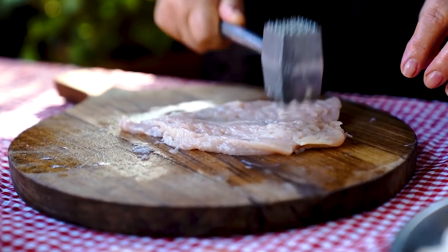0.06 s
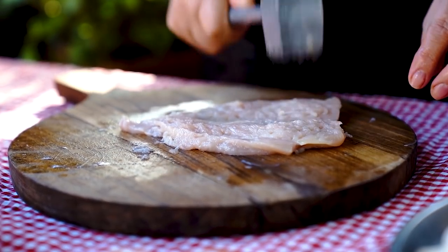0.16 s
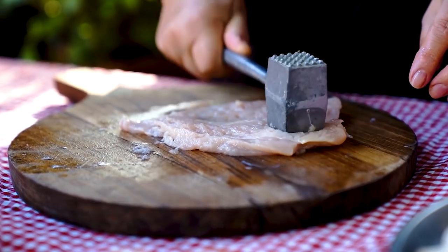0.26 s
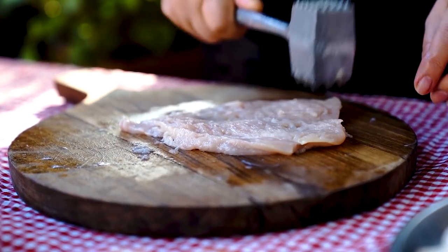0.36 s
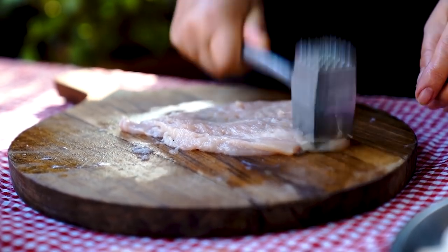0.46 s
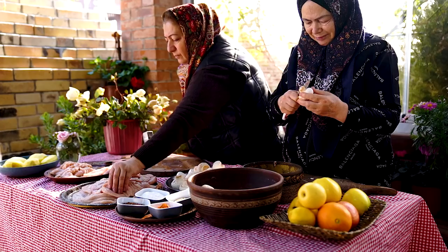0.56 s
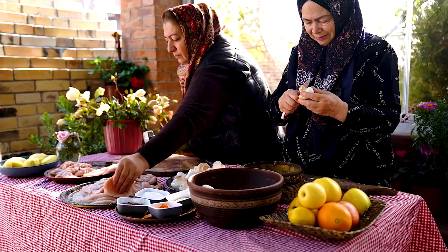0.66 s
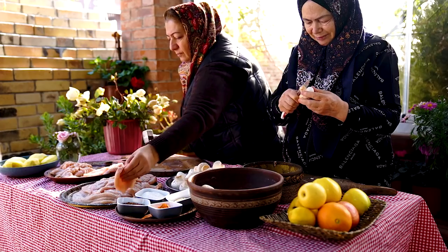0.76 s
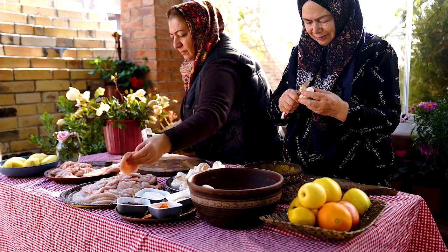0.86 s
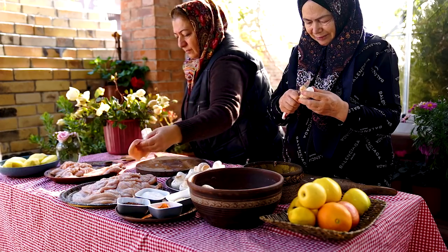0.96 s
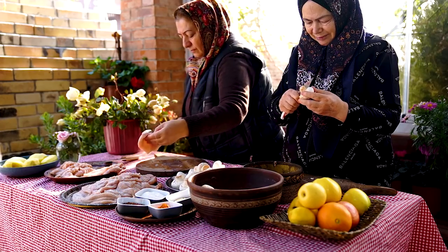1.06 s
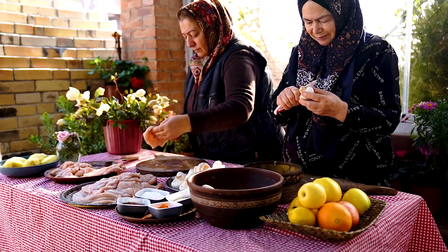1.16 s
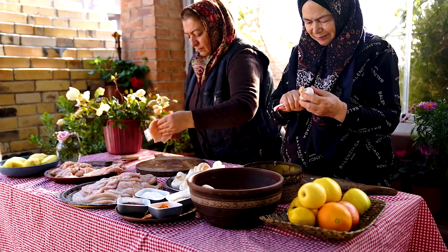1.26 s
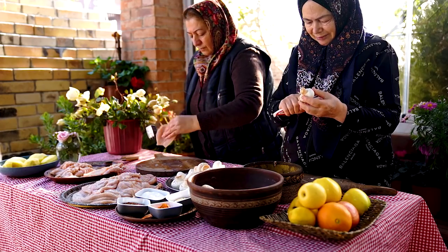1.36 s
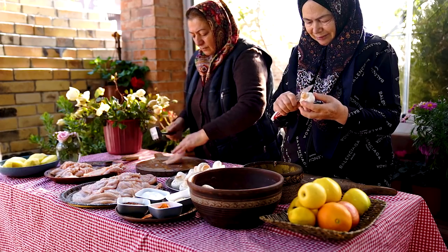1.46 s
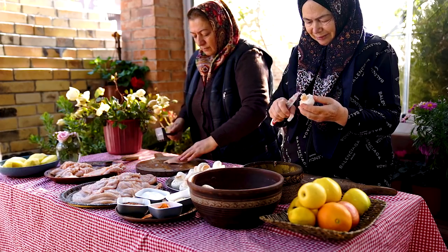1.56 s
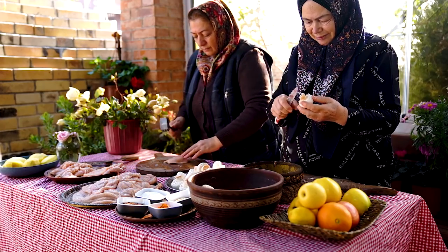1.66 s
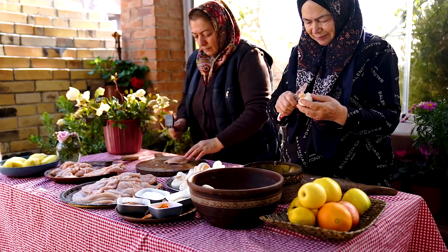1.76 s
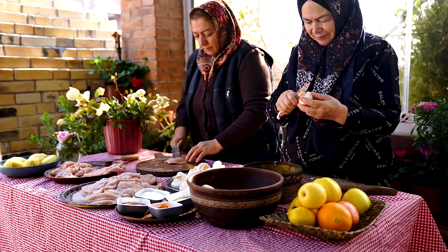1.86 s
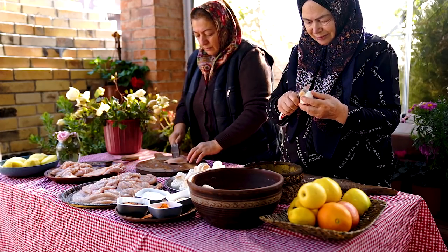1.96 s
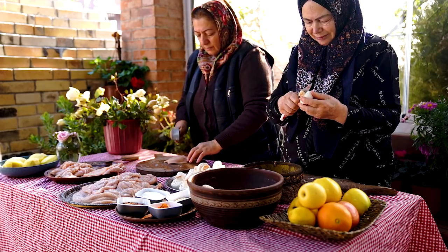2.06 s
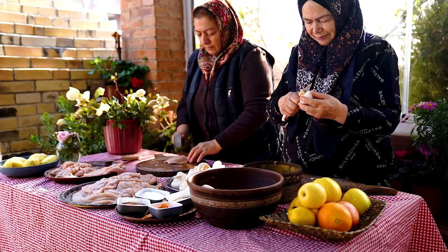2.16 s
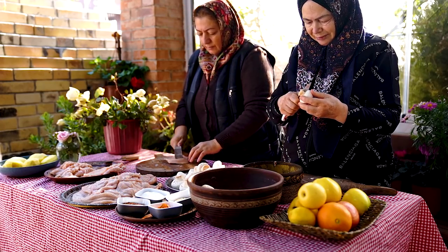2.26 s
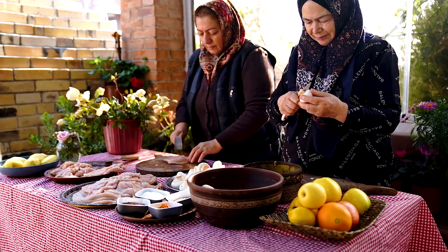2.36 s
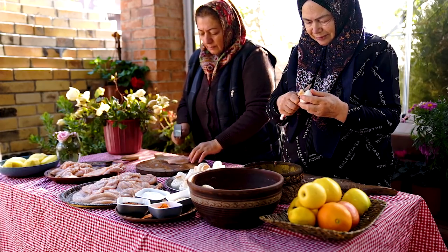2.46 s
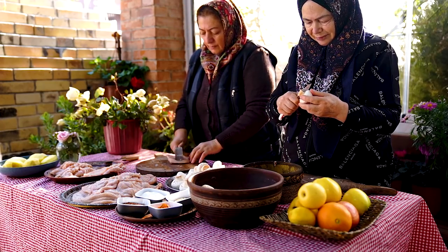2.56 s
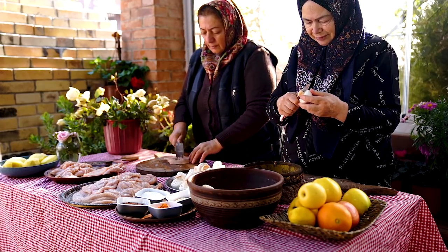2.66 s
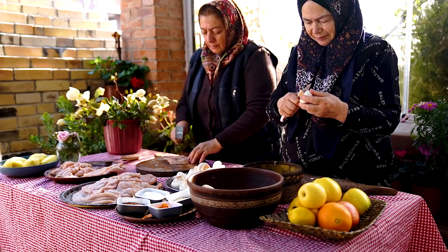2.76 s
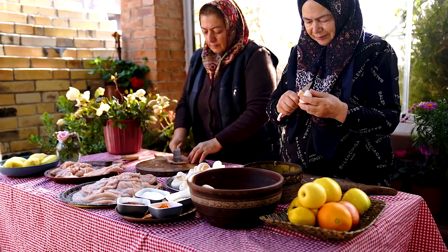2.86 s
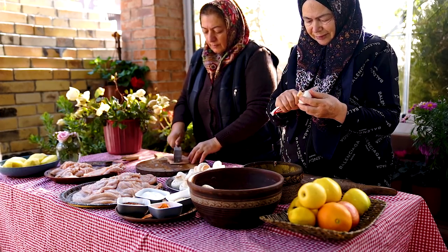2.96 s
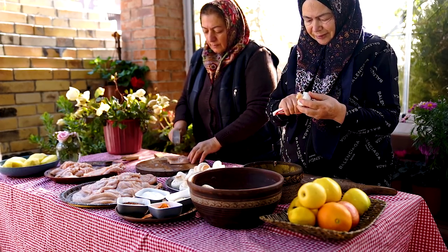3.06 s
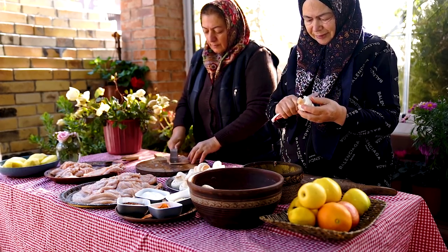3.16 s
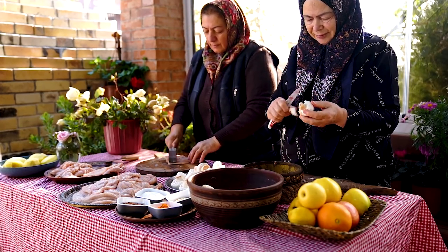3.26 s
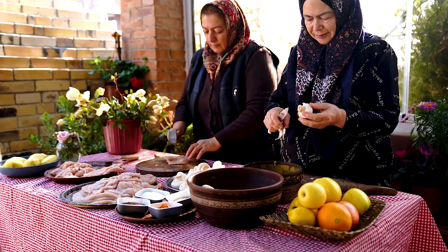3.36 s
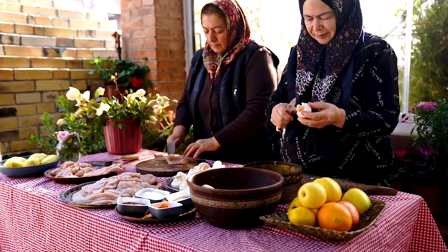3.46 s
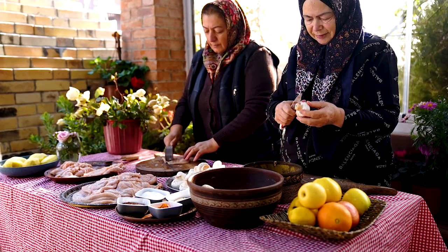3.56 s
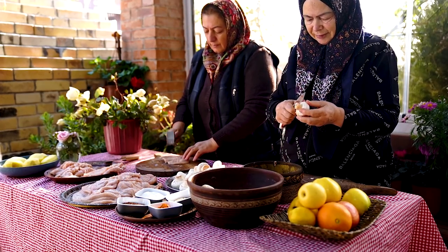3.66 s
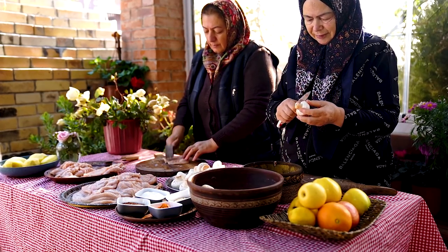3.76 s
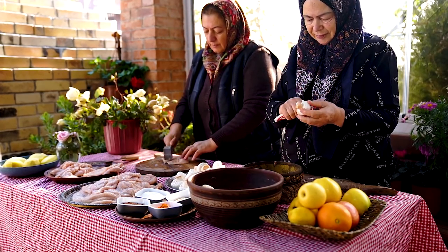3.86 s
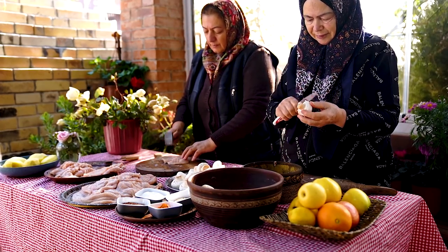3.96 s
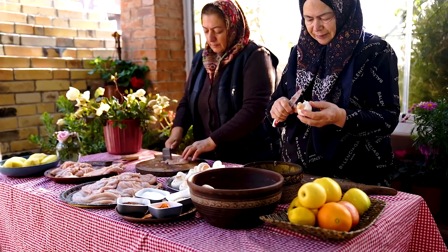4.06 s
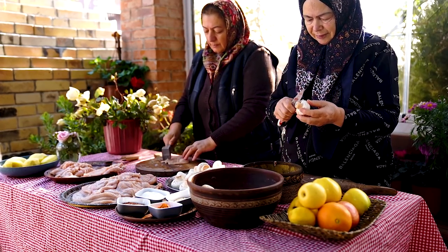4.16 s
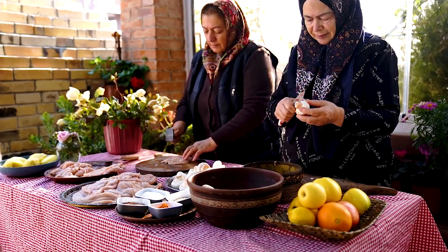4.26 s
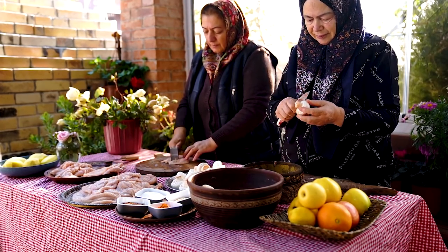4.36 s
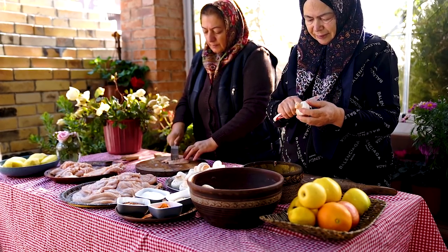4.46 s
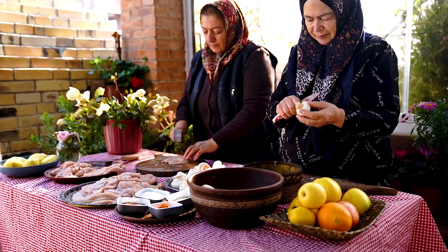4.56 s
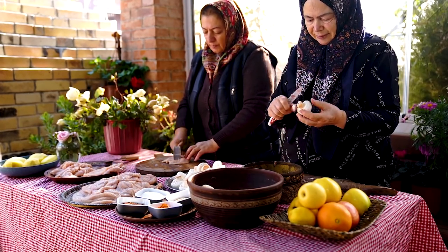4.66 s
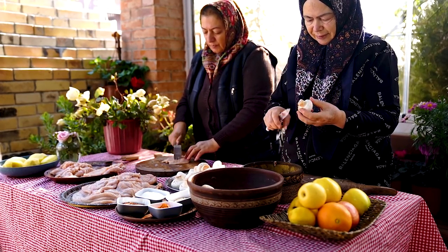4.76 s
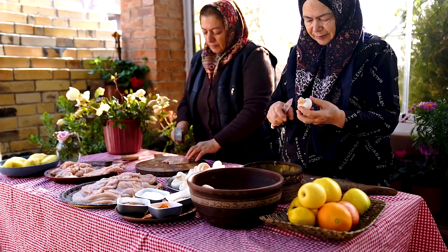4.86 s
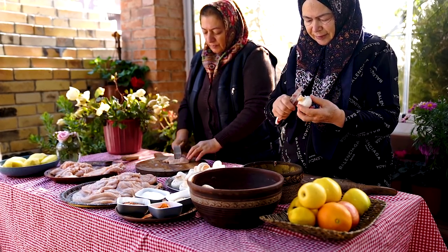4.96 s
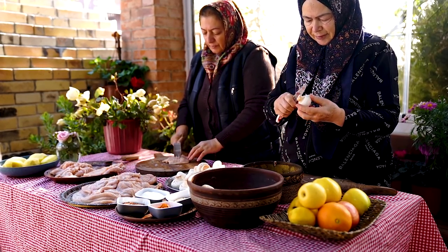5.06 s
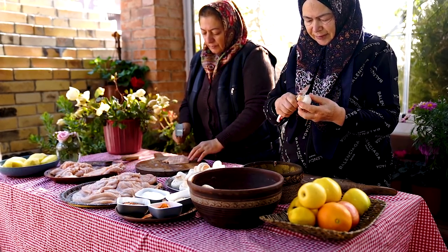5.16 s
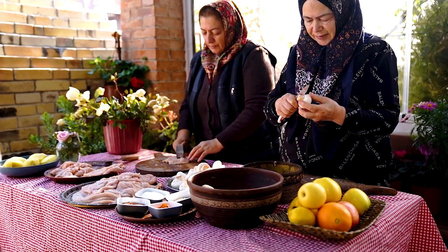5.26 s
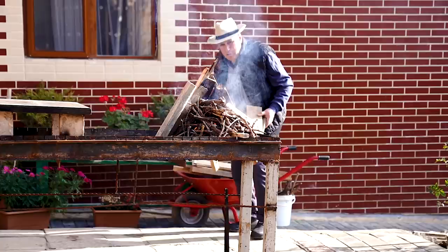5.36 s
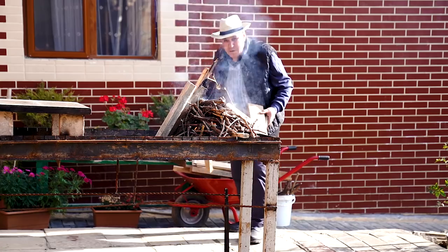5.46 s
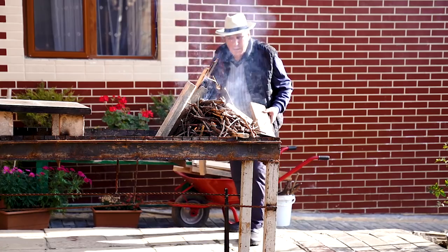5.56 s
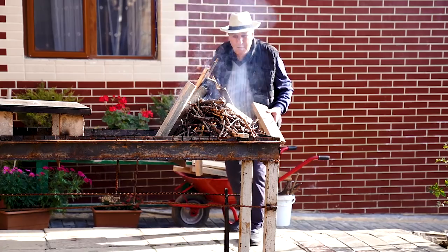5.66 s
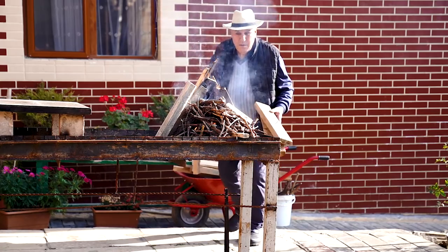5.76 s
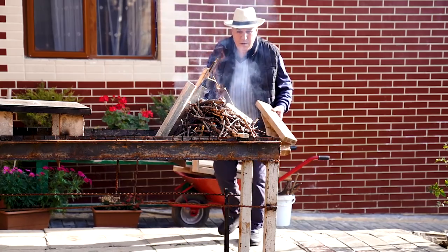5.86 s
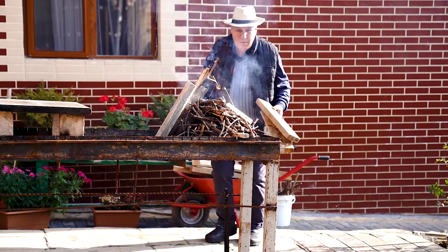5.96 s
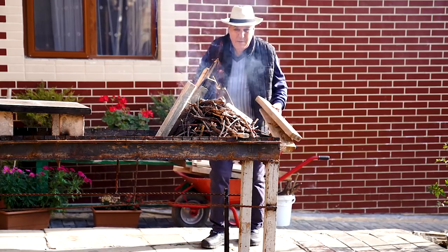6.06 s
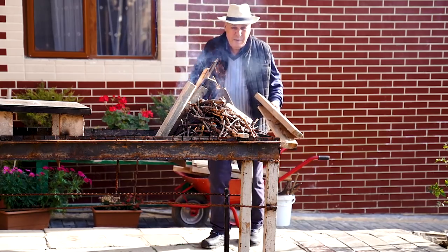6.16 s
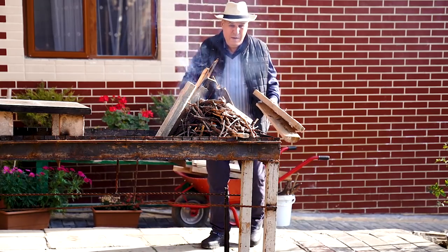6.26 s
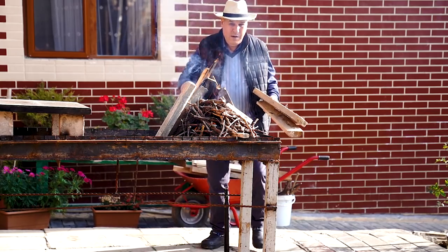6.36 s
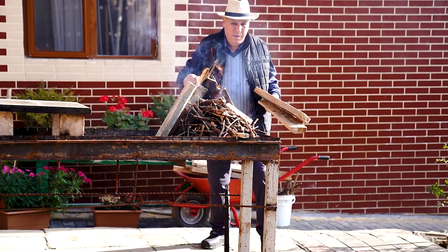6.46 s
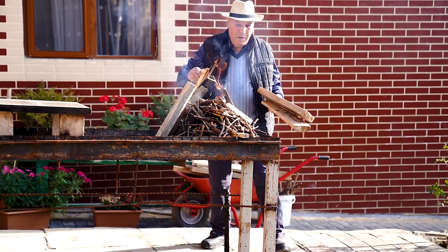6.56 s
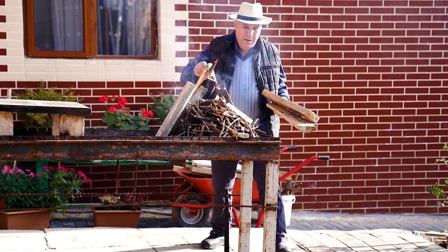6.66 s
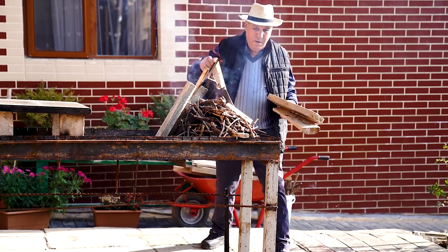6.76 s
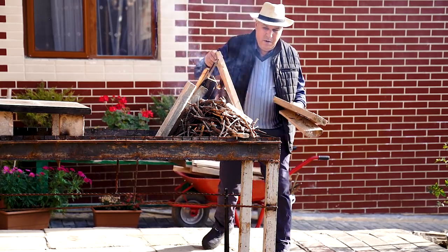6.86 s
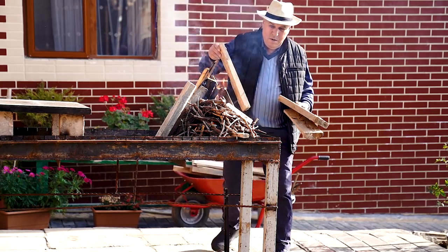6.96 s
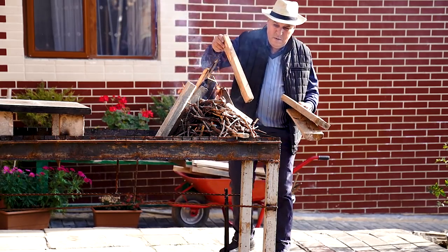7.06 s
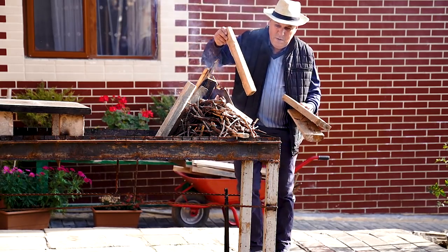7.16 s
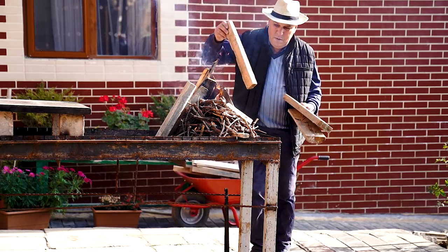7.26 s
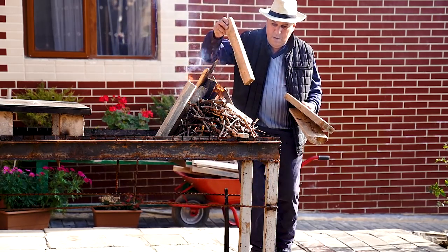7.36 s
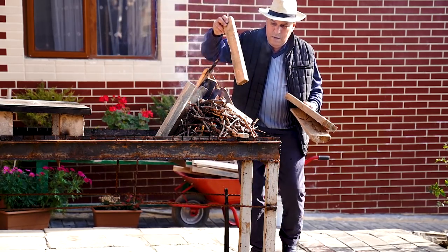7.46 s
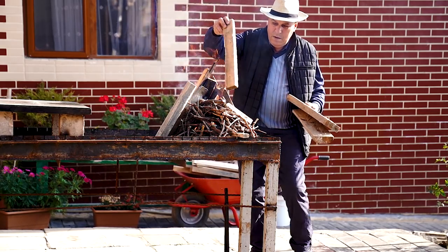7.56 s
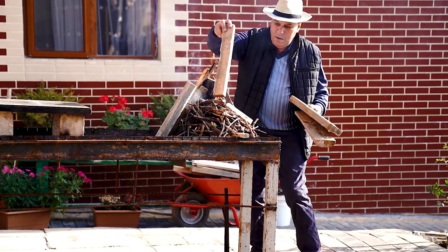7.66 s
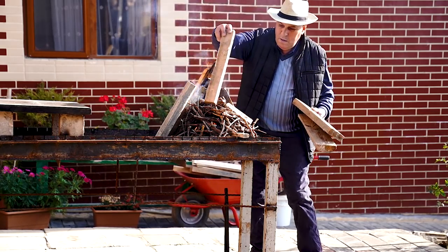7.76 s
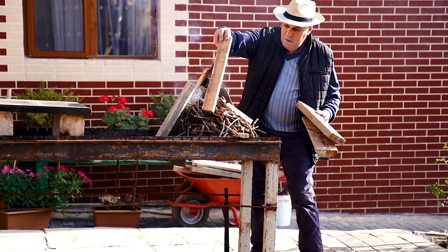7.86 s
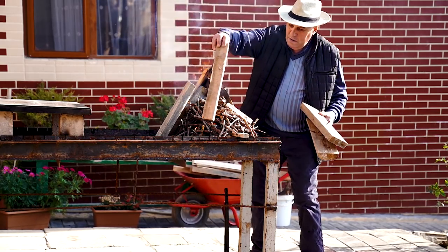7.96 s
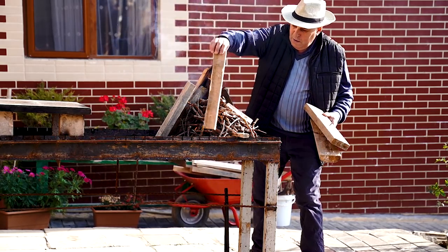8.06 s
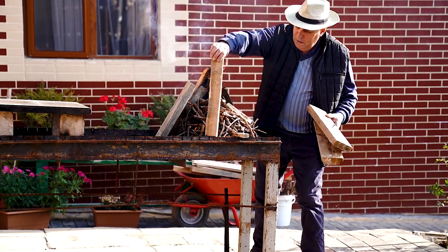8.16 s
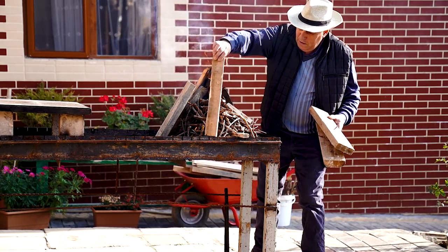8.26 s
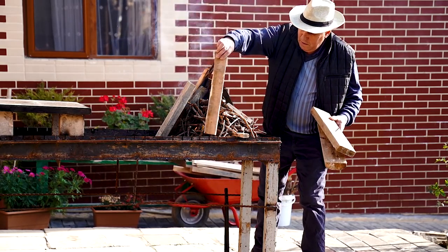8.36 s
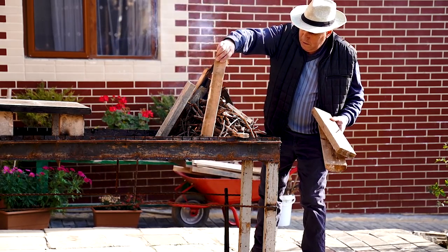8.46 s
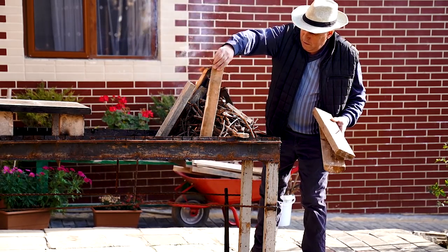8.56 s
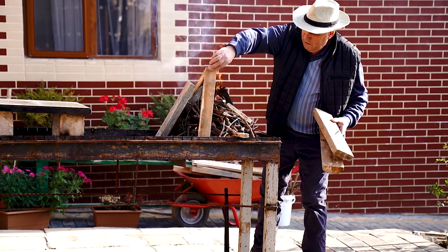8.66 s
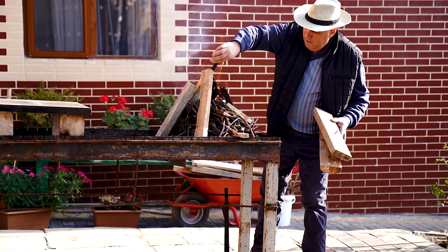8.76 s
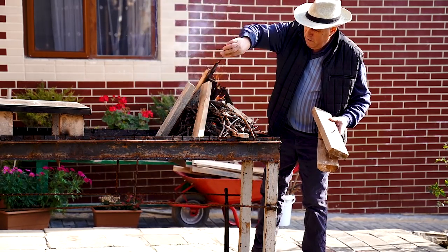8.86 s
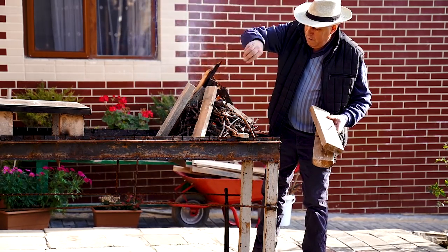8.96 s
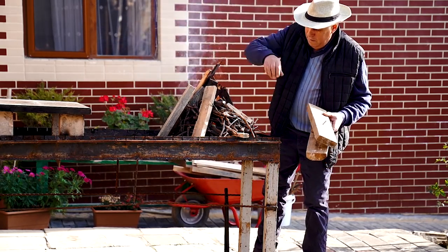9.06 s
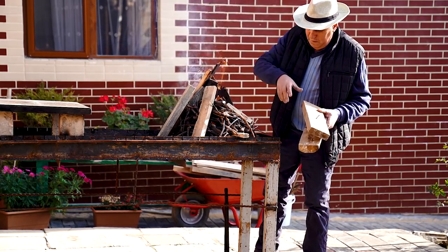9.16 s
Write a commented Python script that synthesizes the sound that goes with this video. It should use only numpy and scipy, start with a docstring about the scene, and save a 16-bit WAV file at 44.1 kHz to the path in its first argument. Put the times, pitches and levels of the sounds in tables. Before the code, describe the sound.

Wet mallet thuds on meat and clattering dishes on a porch give way to quiet knocks of firewood and faint birdsong in a yard.

```python
"""A metal mallet pounds raw chicken on a wooden board: the studs slap and squelch, the board thuds,
crockery rings along, and a hard-walled porch answers each blow. Kitchenware clacks in between.
Then the porch's air falls away and firewood is scraped and knocked onto a pile in a quiet yard.
Board, mallet and crockery are decaying sine modes; slaps, knocks and scrapes are filtered noise.
A small distant bird chirps now and then in gliding tones, over outdoor hiss and a faint insect."""
import sys
import numpy as np
from scipy import signal
from scipy.fft import rfft, irfft
from scipy.io import wavfile
from scipy.ndimage import uniform_filter1d

SR = 44100
rng = np.random.default_rng(int(sys.argv[2]) if len(sys.argv) > 2 else 0)


def dump_mix(stems):
    """Bounce the given channels to the path in sys.argv[1] as a 16-bit WAV at rate SR."""
    frames = np.atleast_2d(stems).T  # one column per channel
    limited = np.clip(frames, -1, 1)  # hard clip at full scale
    pcm = np.round(limited * 32767).astype(np.int16)
    wavfile.write(sys.argv[1], SR, pcm)


N = 405700
TIME = np.arange(N) / SR
TAIL = np.arange(int(.9 * SR)) / SR  # time axis of one hit and its decay


def amp(db):
    return 10 ** (np.asarray(db) / 20)


def sized(x, db):
    """Gives x the energy of a hundredth of a second at level db."""
    return amp(db) * x * np.sqrt(SR / 100 / (np.sum(x ** 2) + 1e-20))


def read(points, hz):
    """A curve joined by straight lines over log frequency."""
    freqs, values = np.transpose(points)
    return np.interp(np.log(hz + 1), np.log(freqs), values)


def add(mix, start_s, sound):
    """Places a sound; whatever still rings at a stop is ducked there."""
    # abrupt drops in the ringing: time_s, drop_db
    stops = [(.586, -16.5), (5.426, -19.5)]
    t = start_s + np.arange(len(sound)) / SR
    for stop_s, drop_db in stops:
        if start_s < stop_s:
            sound = sound * amp(drop_db * np.clip((t - stop_s) / .002, 0, 1))
    part = mix[max(round(start_s * SR), 0):][:len(sound)]
    part += sound[:len(part)]


def colour(x, db_at, size=2048):
    """Minimum-phase EQ shaped like db_at(hz); it keeps the energy of white noise."""
    db = db_at(abs(np.fft.fftfreq(size, 1 / SR)) + 1)
    log_gain = np.log(amp(np.maximum(db - db.max(), -90)))
    taps = np.fft.ifft(np.exp(np.conj(signal.hilbert(log_gain)))).real[:size // 2]
    return signal.fftconvolve(x, taps / np.linalg.norm(taps))[:len(x)]


def hump(centre_hz, bass_slope, treble_slope, top_hz=12000, bass_hz=95):
    """EQ curve of a small, heavily damped object: one broad peak, slopes in dB per octave."""
    def db_at(hz):
        octaves = np.log2(hz / centre_hz)
        skirts = amp(-bass_slope * octaves) ** 2 + amp(treble_slope * octaves) ** 2
        edges = (1 + (hz / top_hz) ** 4) * (1 + (bass_hz / hz) ** 4)
        return -10 * np.log10(skirts * edges)
    return db_at


def ribbed(db_at, ring_hz, ring_db, ripple_db=2.4):
    """Adds one strong resonance, and the many weak ones that change with the point of contact."""
    ripple = np.c_[np.geomspace(300, 17000, 90), ripple_db * rng.standard_normal(90)]
    return lambda hz: db_at(hz) + read(ripple, hz) + ring_db / (1 + ((hz / ring_hz - 1) / .14) ** 2)


def burst(envelope):
    """Noise under an envelope, with a flattened spectrum and unit energy."""
    x = rng.standard_normal(len(envelope)) * envelope
    for _ in range(3):
        flat = irfft(np.exp(1j * np.angle(rfft(x))), len(x))
        x = flat * (envelope > .02) * envelope ** .25
    return x / np.linalg.norm(x)


def crackle(decay_s, pops_per_s=1500):
    """Tiny uneven pops in a dying fizz, with unit energy."""
    pops = rng.standard_normal(len(TAIL)) * (.3 + (rng.random(len(TAIL)) < pops_per_s / SR))
    pops *= np.exp(-TAIL / decay_s)
    return pops / np.linalg.norm(pops)


def mode(hz, t60_s):
    """One resonance ringing out."""
    return np.sin(2 * np.pi * hz * TAIL) * np.exp(-np.log(1000) * TAIL / t60_s)


def excite(drive, response):
    """Plays drive through an impulse response, keeping its length."""
    return signal.fftconvolve(drive, response)[:len(drive)]


def porch(build_s=.0046, hold_s=.016):
    """Dense reflections of unit energy: they build, hold briefly, then each band dies at its own rate."""
    # reverb time between the hard walls: band_hz, t60_s
    decay_times = [(60, 0.26), (260, 0.42), (700, 0.45), (1800, 0.47), (4800, 0.39), (9000, 0.33),
                   (15000, 0.082)]
    hz, t, bands = signal.stft(burst(np.ones(len(TAIL))), SR, nperseg=256)
    age_s = np.hypot(t, hold_s) - hold_s
    bands = bands * amp(-60 * age_s / read(decay_times, hz)[:, None])
    tail = signal.istft(bands, SR, nperseg=256)[1][:len(TAIL)]
    tail *= 1 - np.exp(-TAIL / build_s)
    return tail / np.linalg.norm(tail)


def noise_bed(db_at, levels):
    """Noise of a given spectrum riding a fader curve of (time_s, level_db)."""
    x = irfft(rfft(rng.standard_normal(N)) * amp(db_at(np.fft.rfftfreq(N, 1 / SR))), N)
    return x / x.std() * amp(np.interp(TIME, *np.transpose(levels)))


def yard_air(level_db=-65.5):
    """Soft outdoor hiss over a low rumble."""
    # tone of the open yard: band_hz, relative_db
    spectrum = [(18, -46.5), (30, -16), (98, -0.5), (121, -5.5), (157, -3.5), (280, -11.5), (666, -15),
                (721, -17.5), (1720, -18.5), (2610, -18.5), (2980, -28), (3580, -19.5), (6550, -33),
                (16000, -43.5)]
    # its slow drift: time_s, gain_db
    drift = [(0, -0.5), (1.4, -9.5), (4, 3.5), (5.7, 1), (9.2, 5.5)]
    return amp(level_db) * noise_bed(lambda hz: read(spectrum, hz), drift)


def porch_air():
    """Hollow room tone that falls away after the last blow."""
    # tone of the porch: band_hz, relative_db
    spectrum = [(30, -19.5), (70, -6), (130, 9), (250, -13.5), (430, 0.5), (620, 8), (800, -7), (1200, 1.5),
                (2000, -10.5), (3200, -32), (8000, -41.5)]
    # its fade: time_s, level_db
    fade = [(0, -49), (1.05, -56), (2.5, -58), (5.301, -67.5), (5.599, -90), (9.2, -76)]
    return noise_bed(lambda hz: read(spectrum, hz), fade)


def insect(pitch_hz=3644, width_hz=9, start_s=5.66, end_s=6.86, fade_s=.22, song_db=-75, faint_db=-88):
    """A thin tone of narrow-band noise that swells once and is otherwise faint."""
    song = [(start_s - fade_s, faint_db), (start_s, song_db),
            (end_s, song_db), (end_s + fade_s, faint_db)]
    return noise_bed(lambda hz: -20 * np.log10(1 + ((hz - pitch_hz) / width_hz) ** 2), song)


def chirp(length_s, pitches_hz, rasp_hz, jitter_samples=30):
    """A slightly detuned note gliding through three pitches; quick jitter makes it rasp."""
    u = np.linspace(0, 1, int(length_s * SR))
    jitter = uniform_filter1d(rng.standard_normal(len(u)), jitter_samples) * np.sqrt(jitter_samples)
    glide_hz = np.polyval(np.polyfit([0, .5, 1], pitches_hz, 2), u)
    hz = glide_hz * rng.uniform(.94, 1.01) + rasp_hz * jitter
    return np.sin(2 * np.pi * np.cumsum(hz) / SR) * np.sin(np.pi * u)


def bird(syllable_s=.109, wet_db=-8):
    """A distant bird: single whistles, and trills whose syllables flick up, then drop low."""
    # trills: start_s, end_s, level_db
    trills = [(3.631, 4.12, -50), (8.3, 8.91, -52)]
    # whistles: start_s, level_db, length_s, pitch_hz, glide_octaves
    whistles = [(0.95, -73.5, 0.053, 6720, -.17), (4.349, -49.5, 0.019, 3510, 0.39),
                (4.367, -52, 0.021, 4750, 0.21), (6.273, -64.5, 0.029, 3940, .2),
                (6.366, -74.5, .065, 7220, -0.11), (6.45, -73, .03, 6700, -.15),
                (6.545, -58.5, .04, 3850, .2), (7.975, -58.5, 0.098, 5720, -.03),
                (8.12, -55, .055, 4450, -.39), (8.165, -49.5, 0.047, 3440, 0.21)]
    out = np.zeros(N)
    for start_s, end_s, db in trills:
        for onset_s in np.arange(start_s, end_s, syllable_s):
            add(out, onset_s + .0044, amp(db - 4.5) * chirp(.021, (4054, 4750, 5600), rasp_hz=110))
            add(out, onset_s + .029, amp(db) * chirp(.018, (4050, 3300, 2680), rasp_hz=81))
    for start_s, db, length_s, hz, glide_octaves in whistles:
        step = 2 ** (glide_octaves / 2)
        note = chirp(length_s, (hz / step, hz, hz * step), rasp_hz=.02 * hz, jitter_samples=60)
        add(out, start_s, amp(db) * note)
    return out + amp(wet_db) * excite(out, porch())


def contacts(rows, envelope, bass_slope, treble_slope, ring_db, wet_db, ripple_db=2.4):
    """Each contact is a noise burst and its reflections, coloured by the object's resonances."""
    out = np.zeros(N)
    for start_s, db, length_s, ring_hz, top_hz in rows:
        drive = burst(envelope(TAIL / length_s))
        drive = drive + amp(wet_db) * excite(drive, porch())
        steepening = (1000 / ring_hz) ** .16  # large, low objects lose their bass faster
        body = hump(ring_hz, bass_slope * steepening, treble_slope, top_hz)
        sound = colour(drive, ribbed(body, ring_hz, ring_db, ripple_db))
        add(out, start_s, sized(sound, db) * np.hypot(1, amp(wet_db)))
    return out


def knock(u):
    """Envelope of a hard contact: it chatters evenly, then ends."""
    return 1 / (1 + u ** 5)


def rub(u, grain_db=3):
    """Envelope of a rub: it swells and fades, catching on the grain."""
    catches = np.repeat(rng.standard_normal(len(u)), 90)[:len(u)]
    return np.sin(np.pi * np.minimum(u, 1) ** .8) * amp(grain_db * catches)


def scrapes():
    """Short, grainy friction as things slide, first on the porch, then at the woodpile."""
    # slides and rubs: start_s, level_db, length_s, resonance_hz, top_hz
    scuffs = [(1.005, -41.5, 0.047, 930, 950), (1.46, -40, 0.082, 1120, 860),
              (5.541, -38, 0.071, 4150, 3925), (6.035, -47.5, 0.0485, 1000, 2800),
              (6.1, -40.5, 0.076, 260, 7100), (7.25, -39.5, 0.074, 4396, 3930),
              (7.675, -50, .03, 896, 1410), (7.745, -46.5, 0.061, 940, 6000),
              (8.575, -34, 0.16, 1790, 1040)]
    return contacts(scuffs, rub, bass_slope=6.5, treble_slope=1.9, ring_db=8.5, wet_db=-6.5,
                    ripple_db=3.2)


def firewood():
    """Logs land on the pile with heavily damped knocks."""
    # knocks: start_s, level_db, length_s, resonance_hz, top_hz
    logs = [(7.222, -51.5, 0.00197, 7530, 13000), (7.4146, -30, 0.0295, 2120, 16040),
            (8.231, -32, 0.039, 216, 770), (8.943, -55, 0.00211, 4990, 12140),
            (8.955, -34, 0.046, 190, 660), (9.043, -25.5, 0.046, 4130, 9700)]
    return contacts(logs, knock, bass_slope=10.8, treble_slope=3.2, ring_db=4, wet_db=-2.5)


def kitchenware():
    """Hard kitchenware clacks as it is set down and knocked together."""
    # clacks: start_s, level_db, length_s, resonance_hz, top_hz
    clacks = [(.6143, -11.5, 0.0038, 2694, 5050), (1.538, -35, 0.014, 1200, 14000),
              (1.6472, -29, 0.0033, 2875, 3200), (1.763, -18, 0.0044, 2500, 3146),
              (2.8608, -14, 0.0036, 2300, 13000), (2.878, -14.5, 0.043, 4350, 7500),
              (2.927, -7.5, 0.0086, 560, 2700), (3.2398, -7.5, .003, 1450, 1836),
              (3.268, -10, 0.041, 1170, 1786), (4.227, -48, 0.0022, 5000, 11200),
              (5.4546, -43, .0012, 4400, 6000)]
    return contacts(clacks, knock, bass_slope=4.2, treble_slope=5, ring_db=7.5, wet_db=-2)


def table_thumps():
    """The table booms in one low mode when something is set down, and the porch holds the note."""
    # thumps: start_s, level_db
    thumps = [(.6143, -31.5), (1.648, -33), (1.765, -29.5), (2.926, -22.5)]
    out = np.zeros(N)
    for start_s, db in thumps:
        thump = mode(119.9 * rng.uniform(.75, 1.4), t60_s=.081)
        add(out, start_s, sized(thump + excite(thump, porch()), db))
    return out


def crockery(force):
    """Crockery on the table rings along with a blow."""
    # crockery modes: pitch_hz, t60_s, level_db
    modes = [(287, 0.71, -18.5), (328, 0.55, -14), (675, 1.3, -38.5), (813.5, 0.49, -20), (1000, .9, -45),
             (1100, 0.19, -52), (1340, 0.94, -34.5), (1910, 0.88, -32.5)]
    ring = sum(amp(db) * mode(hz, t60_s) for hz, t60_s, db in modes)
    return excite(force / force.sum(), ring)


def smacks():
    """After a blow the wet meat lets go of the studs in two short crackles."""
    # releases: delay_s, relative_db
    releases = [(0.0304, -7.5), (.061, -13.5)]
    out = np.zeros(len(TAIL))
    for delay_s, db in releases:
        smack = colour(crackle(decay_s=.0028), ribbed(hump(3800, 4.6, 4.4), ring_hz=4300, ring_db=4.2))
        out += np.pad(sized(smack, db), (round(delay_s * SR), 0))[:len(TAIL)]
    return out


def squelch(sink_s, wet_db, release_s=.0023):
    """The meat squelches as the head sinks in, swelling until the board is reached."""
    swell = np.minimum(TAIL / sink_s, 1) ** 3.4
    release = np.exp(-np.maximum(TAIL - sink_s, 0) / release_s)
    return colour(burst(swell * release) + amp(wet_db) * porch(), hump(1150, 7, 15))


def meat_tone(tilt_db, pocket_hz, pocket_db):
    """EQ curve of slapped meat, with the resonance of the air pocket under the head."""
    # wet meat: band_hz, relative_db
    spectrum = [(300, -16), (1000, 5), (2600, -1), (4300, 0), (6000, -5.5), (9000, -10), (13000, -12.5),
                (16000, -19.5)]
    return ribbed(lambda hz: read(spectrum, hz) + tilt_db * np.log2(hz / 3000 + .1), pocket_hz, pocket_db)


def board_thud(force, distance, push_db, wet_db):
    """The push rings the board and table; the walls return all but the deepest bass."""
    # board and table modes: pitch_hz, t60_s, close_db, far_db
    modes = [(45, 0.15, -23, -42.5), (122, .045, 1.5, -11), (188, 0.077, -13, -5),
             (296.9, 0.053, -19.5, -0.5), (467, 0.056, -11, -6.5), (598, 0.039, -13, -2),
             (764, 0.015, -3, -2.5), (1094, 0.02, -10, 0), (1475, 0.012, -6.5, 2), (1870, 0.027, -20.5, -2),
             (2840, 0.02, -10.5, 1)]
    hz, t60_s, close_db, far_db = np.transpose(modes)
    polarity = -(-1) ** np.arange(len(hz))
    gains = polarity * amp(close_db + distance * (far_db - close_db))
    wood = sum(gain * mode(pitch * rng.uniform(.89, 1.054), decay)
               for gain, pitch, decay in zip(gains, hz, t60_s))
    # close blows keep their deep bass; farther ones sound thinner
    low_cut = signal.butter(2, 15 + distance * 36, "high", fs=SR, output="sos")
    thud = sized(signal.sosfilt(low_cut, excite(force, wood)), push_db)
    walls = signal.sosfilt(signal.butter(1, 130, "high", fs=SR, output="sos"), porch())
    return thud + amp(wet_db) * excite(thud, walls)


def mallet_ring(distance, far_db=-13):
    """The metal head rings clearly on close blows and faintly on farther ones."""
    # head modes: pitch_hz, t60_s, level_db
    modes = [(2030, 1.6, -21), (2380, 1.4, -23.5), (3000, .16, -14.5), (3950, .12, -20.5),
             (4440, 0.43, -23)]
    ring = sum(amp(db) * rng.uniform(.77, 1) * mode(hz, t60_s) for hz, t60_s, db in modes)
    return amp(distance * far_db) * ring


def pounding(firm_db=-8, slap_s=.0016):
    """The mallet's studs slap the wet meat; a moment later the squeezed meat pushes the board."""
    # blows: start_s, push_db, distance, slap_db, tilt_db_per_octave, pocket_hz
    # distance 0 is close, deep and dry; 1 is farther, brighter and more echoing
    blows = [(.009, -8.5, 0.35, -33.5, 1.2, 1740), (0.2699, -8, 0.021, -34, -1, 1900),
             (.539, -8, 0.24, -32.5, -4.5, 2150), (1.9322, -5.5, 1, -24, -2, 1720),
             (2.262, -25, 0.8, -39, 2.5, 2300), (2.596, -20.5, 0.6, -32.5, -1.5, 4200),
             (3.551, -22.5, 0.8, -37, 0, 3090), (3.8457, -19, 0.77, -35, 1.6, 3000),
             (4.134, -14.5, .82, -27.5, 0, 2760), (4.432, -13.5, .9, -27.5, -4.5, 2630),
             (4.7241, -11, 0.8, -33, -.5, 2700), (5.024, -8.5, 0.99, -30, -0.5, 10500),
             (5.328, -7.5, 1, -28, -4.5, 2760)]
    out = np.zeros(N)
    for start_s, push_db, distance, slap_db, tilt_db, pocket_hz in blows:
        # softer blows sink more slowly, sound duller and linger more
        softness_db = firm_db - push_db
        sink_s = .004 * amp(softness_db) ** .3
        contact_s = .00017 * amp(softness_db) ** .78
        wet_db = -11 + 7 * distance + .32 * softness_db
        force = TAIL / contact_s * np.exp(-TAIL / contact_s)
        impact = board_thud(force, distance, push_db, wet_db)
        impact += amp(push_db - 2) * distance * crockery(force)
        impact += amp(slap_db + 2) * mallet_ring(distance)
        add(out, start_s + sink_s, impact)
        add(out, start_s, sized(squelch(sink_s, wet_db), push_db - 19 - .2 * softness_db))
        # the first touch slaps, then juice spits out from under the head
        tone = meat_tone(tilt_db, pocket_hz, pocket_db=10 - 1.5 * distance)
        slap = burst(TAIL / slap_s * np.exp(-TAIL / slap_s)) + amp(wet_db + 1) * porch()
        add(out, start_s - slap_s, sized(colour(slap, tone), slap_db + 2.5))
        juice = crackle(decay_s=.0034) + amp(wet_db + 1) * porch()
        add(out, start_s + sink_s + .002, sized(colour(juice, tone), slap_db - 2))
        add(out, start_s, amp(slap_db - 12 * distance) * smacks())
    return out


def scene():
    """All layers, panned to the centre."""
    mono = pounding() + table_thumps() + bird()
    mono += yard_air() + porch_air() + insect()
    mono += kitchenware() + firewood() + scrapes()
    return np.array([mono, mono])


def record(dry, ceiling=.9, cutoff_hz=16300):
    """A soft clip rounds the loudest peaks, then a steep low-pass trims the top."""
    rounded = dry / (1 + (dry / ceiling) ** 6) ** (1 / 6)
    low_pass = signal.firwin(511, cutoff_hz, window=("kaiser", 9), fs=SR)
    return signal.oaconvolve(rounded, low_pass[None], "same")


dry = scene()
out = record(dry)
dump_mix(out)
```